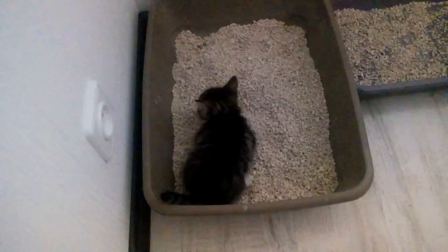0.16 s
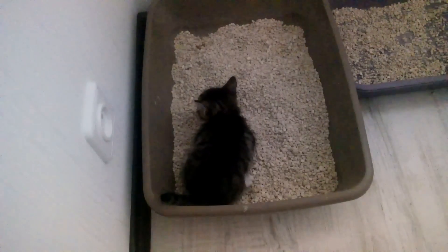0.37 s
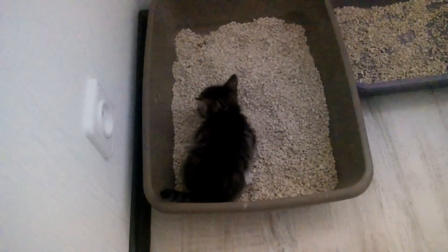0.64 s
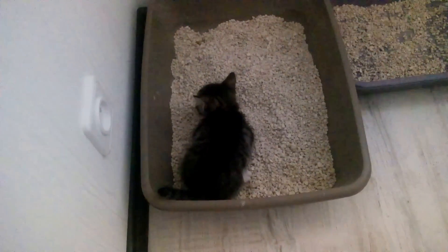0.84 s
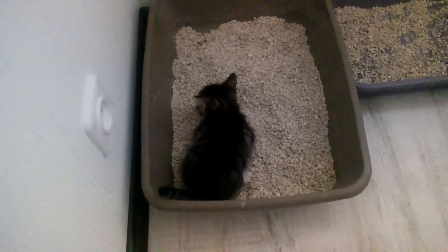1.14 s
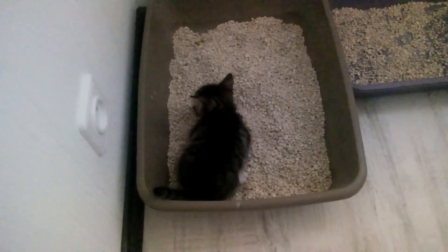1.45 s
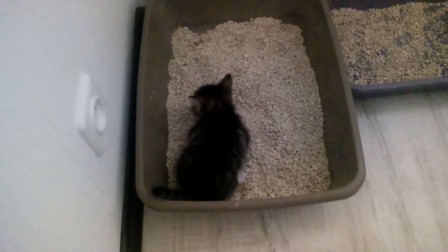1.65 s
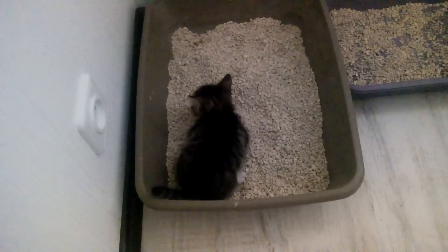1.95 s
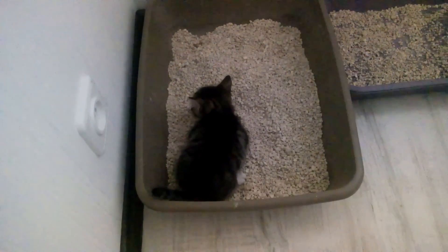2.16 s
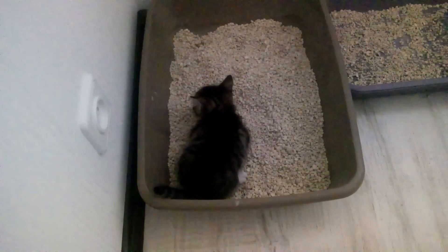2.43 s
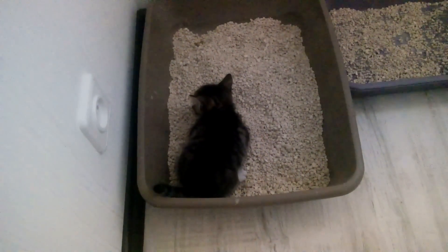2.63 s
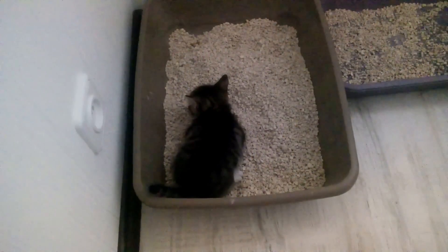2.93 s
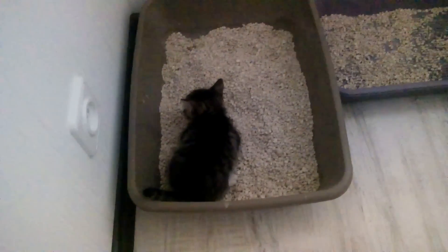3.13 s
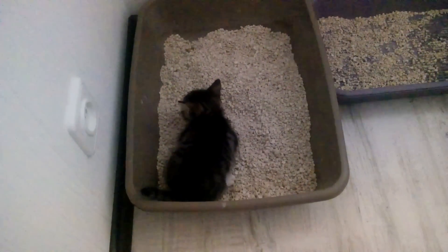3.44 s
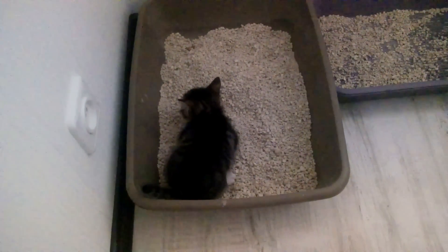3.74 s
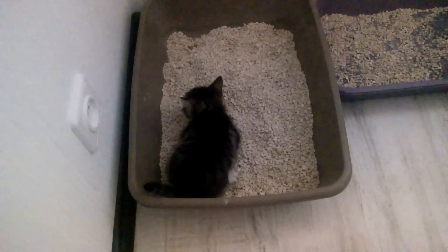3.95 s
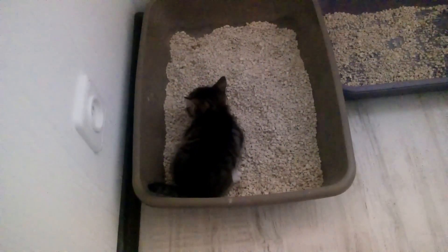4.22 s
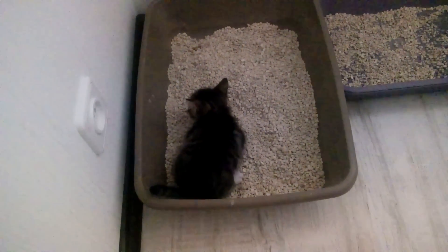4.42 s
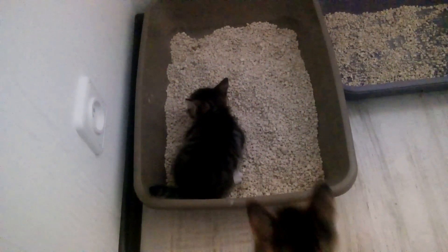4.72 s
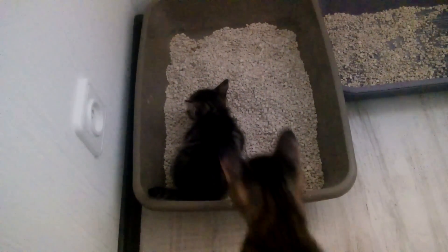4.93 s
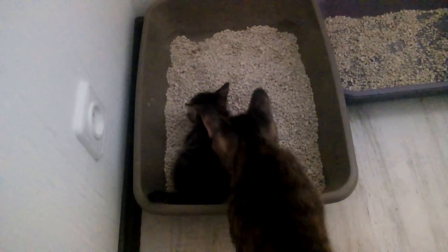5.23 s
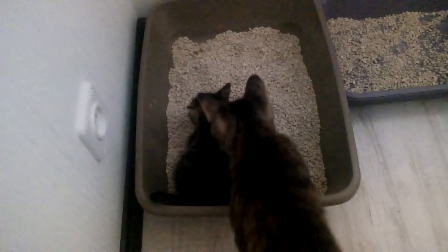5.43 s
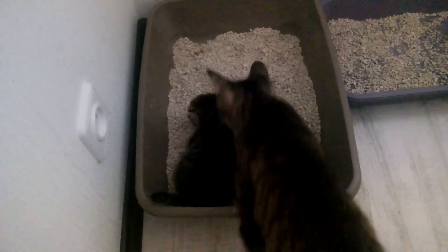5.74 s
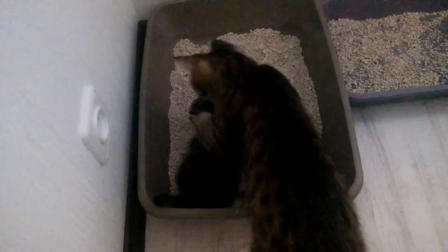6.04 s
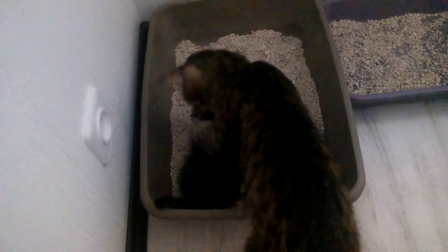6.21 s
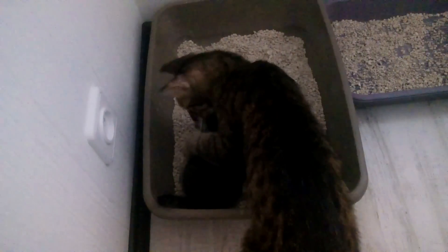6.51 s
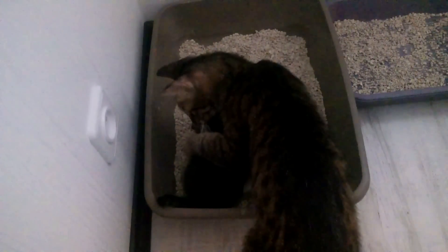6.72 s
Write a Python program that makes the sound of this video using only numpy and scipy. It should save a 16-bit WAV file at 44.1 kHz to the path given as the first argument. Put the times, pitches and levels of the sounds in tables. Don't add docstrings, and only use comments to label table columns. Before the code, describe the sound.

Quiet tiled indoor room with microphone hiss, slight hum and low rumble. Faint granule slides and tiny snaps come first, then soft rolling trills from a mother cat at some distance. A kitten nearby mews twice, clear, high and slightly quavering, with a long wavering adult call between. During the second mew, heavier paws crunch into the litter. Short scrapes and a faint brief adult grunt end it.

```python
import sys
import numpy as np
from scipy import signal
from scipy.fft import rfft, irfft, next_fast_len
from scipy.io import wavfile
from scipy.ndimage import uniform_filter1d, map_coordinates

SR = 44100
rng = np.random.default_rng(int(sys.argv[2]) if len(sys.argv) > 2 else 0)


def amplitude_ratio(level_db):
    exponent = np.asarray(level_db, float) / 20
    return 10 ** exponent


def master_out(mix):
    frames = np.transpose(np.atleast_2d(mix))
    ceiling = np.clip(frames, -1, 1)
    pcm = np.round(ceiling * 32767).astype(np.int16)
    wavfile.write(sys.argv[1], SR, pcm)


N = 302967
TIME = np.arange(N) / SR

# frequency in Hz, density in dB per Hz.
HISS_SPECTRUM = [(40, -40), (75, -7), (350, 2.5), (1000, -3), (2600, -6.5), (4400, -4.5), (5700, -9),
                 (6600, -7.5), (7300, -10), (11000, -9.5), (12700, -10.5), (15700, -11)]
# frequency in Hz, rms level in dB.
MAINS_HUM = [(50, -84), (100, -96), (150, -110)]
# time in seconds, level in dB.
RUMBLE_SWELLS = [
    (0.0, -70),
    (0.3, -71),
    (0.8, -77),
    (2.18, -74),
    (3.23, -77),
    (4.02, -74),
    (4.84, -74),
]
# frequency in Hz, time to fall 60 dB in seconds.
ROOM_DECAY = [(300, 0.41), (1500, 0.28), (5000, 0.42), (12000, 0.021)]

# loudest moment in seconds, level in dB, rise in seconds, fall in seconds.
SHUFFLES = [(0.0, -70.5, .01, 0.054), (0.14, -66.5, .12, 0.06), (0.47, -82, .2, .25),
            (1.036, -67, .012, 0.1), (1.828, -70.5, 0.14, .08), (2.646, -66, 0.095, 0.23),
            (2.756, -82.5, 0.081, .09), (4.124, -74, 0.027, 0.068), (6.088, -62.5, 0.026, 0.049),
            (6.268, -81, .01, 0.058), (6.69, -75, 0.15, .05), (6.818, -70.5, 0.038, 0.028)]
# loudest moment in seconds, level in dB, rise in seconds, fall in seconds.
TREAD_CRUNCHES = [
    (5.616, -46.5, 0.043, 0.021),
    (5.67, -62, .05, .08),
    (5.724, -44.5, 0.052, 0.03),
    (5.767, -49, .02, 0.03),
    (5.825, -43, 0.036, 0.013),
    (5.912, -60, 0.074, 0.074),
]
# time in seconds, peak in dB, crack against knock in dB.
GRAIN_SNAPS = [
    (1.0286, -66, -5),
    (1.2067, -70, 1),
    (2.6654, -73, 7),
    (2.7573, -64, 8.5),
    (3.4745, -58, 0),
    (5.1023, -54, -30),
    (6.2687, -62, 6.5),
]
# centre in Hz, width in Hz, level in dB.
GRANULE_MODES = [(2586, 330, 15), (4530, 1200, 17), (6900, 640, -11)]
# centre in Hz, width in Hz, level in dB.
TRAY_MODES = [(2190, 710, 0.5), (5110, 1350, 0), (960, 4200, -10.5), (12900, 2500, -14)]

# time in seconds, pitch in Hz, nasal hum in dB,
# mouth against nose in dB, mouth resonance in Hz.
GREETING_CALL = [(2.06, 613, -78.5, -25, 1150), (2.1, 597, -65, -1.5, 1210),
                 (2.165, 519.6, -58, -2.5, 1170), (2.25, 485, -58, -4, 1100), (2.4, 484, -61, 1.5, 1050),
                 (2.466, 524.2, -57.5, -0.5, 1079), (2.603, 498.3, -60.5, 4, 950),
                 (2.64, 516, -53.5, -19, 1000)]
QUERY_CALL = [(3.189, 637, -80, 12, 1150), (3.219, 576, -64.5, 1, 1110), (3.263, 498, -59.5, -0.5, 1160),
              (3.336, 569.6, -57, -8, 990), (3.398, 564, -59.5, -2.5, 990), (3.434, 642, -66, -19, 1500),
              (3.499, 696, -63, 1, 2200), (3.61, 766, -68.5, 7, 2250), (3.708, 724, -80, 1, 2250)]
SUMMONS_CALL = [(4.255, 807, -85, -20, 1300), (4.296, 817, -53.5, -19, 1300),
                (4.339, 687, -60.5, 10.5, 1600), (4.396, 631.6, -63.5, 11.5, 1510),
                (4.466, 596.4, -61.5, 3.5, 1310), (4.526, 634.6, -59.5, 17, 1940),
                (4.564, 623.2, -58, 24, 1880), (4.645, 575.6, -62.5, 15.5, 1914),
                (4.699, 596.4, -68.5, 15.5, 1500)]
SUMMONS_END_CALL = [(4.69, 578, -61, 7.5, 1490), (4.78, 598.7, -63, 5.5, 1430),
                    (4.844, 599, -58.5, 4, 1450), (4.894, 632.4, -58.5, 7.5, 1530),
                    (4.906, 622, -61.5, 20.5, 1870), (4.947, 620.6, -58, 20.5, 1870),
                    (4.995, 612.5, -63.5, 11, 1580), (5.085, 562.7, -56.5, -6, 1380),
                    (5.151, 579, -72, -6, 1300)]
MURMUR_CALL = [(5.65, 500, -81, -8, 1800), (5.71, 548, -65.5, -10, 1800), (5.74, 614, -71, 12, 1800),
               (5.93, 620, -77, -7, 1820), (5.949, 586, -94, 0, 1790)]
GRUNT_CALL = [(6.635, 500, -86, 2, 1000), (6.656, 503, -72.5, 3, 990), (6.676, 507, -56.5, -13, 970),
              (6.76, 516, -86, -27, 1000)]
# start in seconds, end in seconds, pitch swing as a share,
# beats per second, hoarseness from 0 to 1.
FLUTTERS = [(2.06, 2.3, .055, 58, .09), (2.3, 2.46, .055, 42, .04), (3.18, 3.3, .045, 40, .14),
            (4.29, 4.37, .015, 45, .18), (4.37, 4.51, .03, 40, .06), (4.56, 4.61, .02, 55, .1),
            (4.61, 4.645, .03, 60, .3), (4.645, 4.88, .065, 27, .04), (4.95, 5.17, .03, 42, .13),
            (5.6, 6, .035, 35, .27), (6.6, 6.8, .015, 40, .08)]
# throat in dB, palate ring in Hz, ring in dB,
# ring fade in dB per second, breath in dB.
CALL_POSTURE = [
    (-10, 3370, -4.5, 39, -6),
    (-6, 2830, -12, 5, -11),
    (-6.5, 4100, 1.5, 87, -11),
    (-14, 2600, -11.5, 17, -8),
    (-15, 3700, -12, 5, -15),
    (-30, 4000, -25, 5, -15),
]
# throat resonance in Hz, width of the mouth resonance in Hz,
# the mouth tube's next resonance in dB.
CALL_TRACT = [
    (2140, 345, -33),
    (2050, 300, -26),
    (2450, 444, -25),
    (2510, 328, -48),
    (2300, 336, -40),
    (2200, 370, -40),
]
# centre in Hz, width in Hz, level in dB.
MOTHER_BREATH_MODES = [(930, 900, 10.5), (2320, 630, 10), (4000, 2060, 4.5)]

# time in seconds, pitch in Hz, hum in dB, mouth against hum in dB,
# brightness in dB per octave.
MEW_ONE = [(3.483, 1360, -45.5, -45, -10), (3.546, 1434, -51, -22, 5), (3.556, 1412, -46.5, -4.5, 3.5),
           (3.595, 1504, -48.5, 5, -2.5), (3.655, 1486, -51, 2, 2), (3.74, 1543, -42.5, -7, 4.5),
           (3.829, 1455, -45.5, -6.5, -3), (4.078, 1402, -53, -19.5, 3.5), (4.1, 1128, -46, -30, -5)]
MEW_TWO = [(5.45, 1488, -50, -32, 0), (5.465, 1446, -50, -6.5, 0), (5.51, 1612, -56, 20, -28.5),
           (5.566, 1723, -42.5, 2.5, -1.5), (5.749, 1637, -50, 6, -1), (5.946, 1553, -56.5, 4.5, 5.5),
           (6.0, 1489, -50.5, -6.5, -14), (6.035, 1434, -53, -4, -0.5), (6.078, 1183, -46, -28, 5)]
# frequency in Hz, level in dB.
KITTEN_MOUTH_CURVE = [(1400, 17), (3000, 2), (4700, -1), (5900, -5), (6800, -30.5)]
# frequency in Hz, level against the edge of the voice in dB.
KITTEN_EDGE_CURVE = [(6500, -38), (7500, -9.5), (8800, -21), (10200, -3), (12000, -4), (12900, -7),
                     (15500, -36)]
# centre in Hz, width in Hz, level in dB.
KITTEN_BREATH_MODES = [(1420, 850, 5.5), (2800, 4100, -0.5), (5060, 1180, 5), (12000, 2200, -24)]

BREAK_S, BREAK_HOARSE = .045, .6


def unit(x):
    return x / np.sqrt(np.mean(x ** 2) + 1e-20)


def along(points, hz):
    f, v = np.transpose(points)
    return np.interp(np.log(hz + 1), np.log(f + 1), v)


def wobble(rate, size):
    knots = rng.standard_normal(int(size * 2000 / SR) + 4)
    return map_coordinates(knots, [np.arange(size) * min(rate, 2000) / SR])


def span(rows, fade):
    s, *cols = np.transpose(rows)
    t = TIME[(TIME >= s[0]) & (TIME < s[-1])]
    window = np.clip(np.minimum(t - s[0], s[-1] - t) / fade, 0, 1)
    return round(t[0] * SR), window, [np.interp(t, s, c) for c in cols]


def filtered(x, response):
    m = next_fast_len(N + SR // 2)
    return irfft(rfft(x, m) * response(np.fft.rfftfreq(m, 1 / SR)), m)[:N]


def resonances(modes):
    def response(f):
        total = 0
        for k, (centre, width, db) in enumerate(modes):
            damping = 1j * f * width
            total = total + (-1) ** k * amplitude_ratio(db) * damping / (centre * centre - f * f + damping)
        return total
    return response


def peak(hz, centre_hz, width_hz):
    return -10 * np.log10(1 + ((hz - centre_hz) / width_hz) ** 6)


def summed(*levels_db):
    return 10 * np.log10(sum(amplitude_ratio(db) ** 2 for db in levels_db))


def floor():
    hiss = unit(filtered(rng.standard_normal(N), lambda hz: amplitude_ratio(along(HISS_SPECTRUM, hz))))
    rumble = unit(filtered(rng.standard_normal(N), lambda hz: resonances([(125, 110, 0)])(hz) ** 2))
    hum = sum(np.sqrt(2) * amplitude_ratio(db) * np.sin(2 * np.pi * hz * TIME) for hz, db in MAINS_HUM)
    steady_db = -79 + 1 * wobble(1.5, size=N)
    swell_s = .07
    swells_db = [db - 10 * ((TIME - s) / swell_s) ** 2 for s, db in RUMBLE_SWELLS]
    return amplitude_ratio(-67.5) * hiss + amplitude_ratio(summed(steady_db, *swells_db)) * rumble + hum


def breath(throat):
    return unit(filtered(rng.standard_normal(N), lambda hz: resonances(throat)(hz) ** 2))


def strokes(rows):
    depth_db = 25
    shapes = []
    for s, db, rise, fall in rows:
        begin = (max(s - rise, 0) - .001, db - depth_db * (s > rise))
        shapes.append([begin, (s, db), (s + fall, db - depth_db)])
    return shapes


def grains(shapes, modes, density, spread_db):
    struck = rng.random(N) < density / SR
    hits = struck * rng.standard_normal(N) * amplitude_ratio(spread_db * rng.exponential(size=N))
    contact = unit(hits) + 0.22 * rng.standard_normal(N)
    rasp = unit(filtered(contact, lambda hz: resonances(modes)(hz) ** 2))
    gain = np.zeros(N)
    for shape in shapes:
        start, window, (db,) = span(shape, fade=0.0055)
        gain[start:][:len(db)] += window * amplitude_ratio(db)
    return gain * rasp


def snaps():
    out, t = np.zeros(N + SR), np.arange(600) / SR
    air = breath(GRANULE_MODES)
    for s, db, bright_db in GRAIN_SNAPS:
        start = round(s * SR)
        knock = np.sin(2 * np.pi * 2600 * t) * amplitude_ratio(-60 * t / 0.015)
        crack = air[start:][:len(t)] * amplitude_ratio(bright_db - 60 * t / 0.025)
        out[start:][:len(t)] += amplitude_ratio(db) * (2.0 * knock + crack)
    return out[:N]


def litter():
    slide = grains(strokes(SHUFFLES), GRANULE_MODES, density=2300, spread_db=-1.5)
    crunch = grains(strokes(TREAD_CRUNCHES), TRAY_MODES, density=4000, spread_db=1.5)
    crunch = amplitude_ratio(1.5 * wobble(60, size=N)) * crunch
    return amplitude_ratio(7.0) * slide + amplitude_ratio(3.5) * crunch + snaps()


def voice(pitch, levels_db, hoarse, shimmer_db, smear):
    size = len(pitch)
    phase = 2 * np.pi * np.cumsum(pitch) / SR
    out = np.zeros(size)
    for k, (db, share) in enumerate(zip(levels_db, hoarse), 1):
        share = np.clip(share, 0, 1)
        width = smear * k ** .6
        sine, cosine = np.sin(k * phase), np.cos(k * phase)
        blur = wobble(width, size) * sine + wobble(width, size) * cosine
        tone = np.sqrt(2 * (1 - share)) * sine + np.sqrt(share) * blur
        out += amplitude_ratio(db + shimmer_db * wobble(45.73, size)) * tone * (k * pitch < 15600)
    return out


def palate_flutter():
    calm_swing, calm_hoarse, ease_s = .007, .02, .02
    inside = np.array([(TIME >= row[0]) & (TIME < row[1]) for row in FLUTTERS])
    curves = np.transpose(FLUTTERS)[2:] @ inside
    swing, beats, hoarse = uniform_filter1d(curves, size=round(ease_s * SR), axis=1)
    beats = np.maximum(beats, 25) * (1 + .3 * wobble(15, size=N))
    return (swing + calm_swing) * np.sin(2 * np.pi * np.cumsum(beats) / SR), hoarse + calm_hoarse


def mother_partial_db(k, contour, age, posture, tract):
    pitch, hum, mouth_db, mouth_hz = contour
    throat_db, ring_hz, ring_db, ring_fade, _ = posture
    throat_hz, mouth_width_hz, second_db = tract
    hz = k * pitch
    nose = -26 * np.log2(k)
    first = mouth_db + peak(hz, mouth_hz, mouth_width_hz)
    second = mouth_db + second_db + peak(hz, 2.95 * mouth_hz, 360)
    throat = throat_db + np.minimum(mouth_db, 0) + peak(hz, throat_hz, 244)
    late = 2000 * np.maximum(.04 - age, 0)
    ring = ring_db - ring_fade * age - late + peak(hz, ring_hz, .11 * ring_hz)
    return hum + summed(nose, first, second, throat, ring)


def mother():
    out, air = np.zeros(N), breath(MOTHER_BREATH_MODES)
    flutter, hoarse = palate_flutter()
    calls = (GREETING_CALL, QUERY_CALL, SUMMONS_CALL, SUMMONS_END_CALL, MURMUR_CALL, GRUNT_CALL)
    for call, posture, tract in zip(calls, CALL_POSTURE, CALL_TRACT):
        start, window, contour = span(call, fade=.012)
        pitch, hum = contour[:2]
        size = len(pitch)
        now, age = slice(start, start + size), np.arange(size) / SR
        levels = [mother_partial_db(k, contour, age, posture, tract) for k in range(1, 12)]
        rasp = BREAK_HOARSE * np.exp(-age[::-1] / BREAK_S)
        blur = [hoarse[now] * min(k / 4, 1.5) ** 2 + rasp for k in range(1, 12)]
        pitch = pitch * (1 + flutter[now] + 0.00796 * wobble(117.85, size))
        sound = voice(pitch, levels, blur, shimmer_db=2.6, smear=210)
        leak_db = hum.max() + posture[4] + .73 * (hum - hum.max()) - 8 * age
        out[now] += window * amplitude_ratio(32 * flutter[now]) * (sound + amplitude_ratio(leak_db) * air[now])
    return out


def kitten():
    catch_s, catch_hoarse = .02, .5
    out, air = np.zeros(N), breath(KITTEN_BREATH_MODES)
    for call, edge_db in ((MEW_ONE, -64.5), (MEW_TWO, -72)):
        start, window, (pitch, hum, mouth_db, bright_db) = span(call, fade=.007)
        size = len(pitch)
        now, age = slice(start, start + size), np.arange(size) / SR
        mouth = hum + mouth_db
        rasp = BREAK_HOARSE * np.exp(-age[::-1] / BREAK_S) + catch_hoarse * np.exp(-age / catch_s)
        levels = [hum]
        for k in range(2, 5):
            levels.append(mouth + along(KITTEN_MOUTH_CURVE, k * pitch) + bright_db * np.log2(k / 2))
        edge = edge_db + .32 * (mouth + 48) + np.minimum(mouth_db + 15, 0)
        for k in range(5, 11):
            levels.append(edge + along(KITTEN_EDGE_CURVE, k * pitch) + 3.9 * wobble(12.2, size))
        blur = [.002 * k ** 2.85 + rasp * min(k / 3, 1.5) for k in range(1, 11)]
        pitch = pitch * (1 + 0.00552 * wobble(89.93, size) + 0.00775 * wobble(14, size))
        sound = voice(pitch, levels, blur, shimmer_db=1.8, smear=300)
        sound = sound * amplitude_ratio(2.4 * wobble(80, size))
        leak_db = -62 + .15 * (mouth + 46) - 3 * age
        out[now] += window * (sound + amplitude_ratio(leak_db) * air[now])
    return out


def room(x):
    hz, t, z = signal.stft(rng.standard_normal(SR // 2), SR, nperseg=256)
    decay = amplitude_ratio(-60 * t / along(ROOM_DECAY, hz)[:, None])
    tail = signal.istft(z * decay, SR, nperseg=256)[1]
    return signal.fftconvolve(np.pad(x, (200, 0)), tail / np.linalg.norm(tail))[:N]


def scene():
    far, near, grit = mother(), kitten(), litter()
    wet = room(amplitude_ratio(-6.5) * far + amplitude_ratio(-9) * near + amplitude_ratio(-9) * grit)
    return (amplitude_ratio(3.0) * far + amplitude_ratio(-1.03) * near + grit + wet + floor())[None]


def top_cut(x):
    return signal.sosfilt(signal.butter(12, 15700, fs=SR, output="sos"), x)


def record(dry):
    return top_cut(dry)


dry = scene()
out = record(dry)
master_out(out)
```